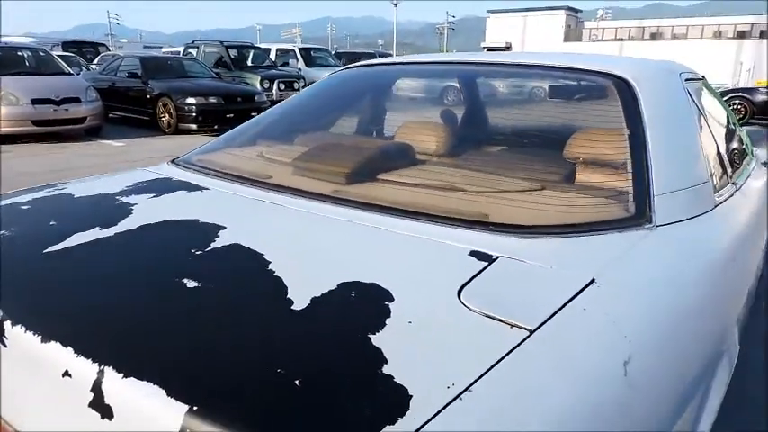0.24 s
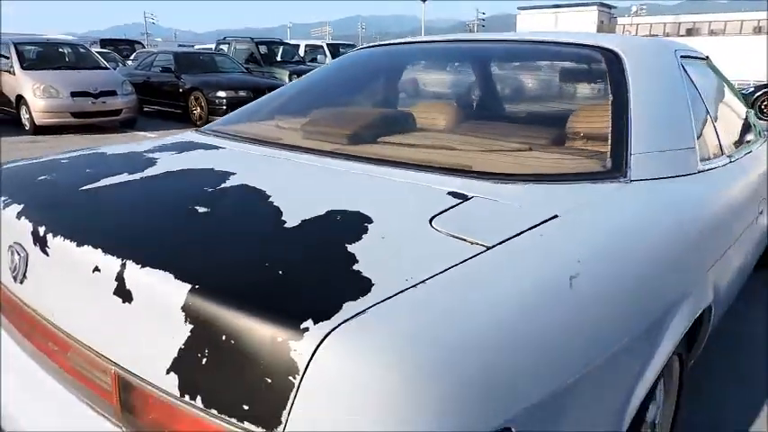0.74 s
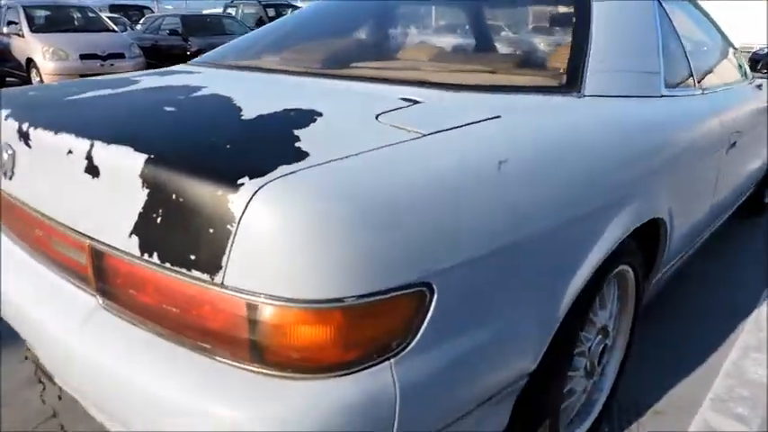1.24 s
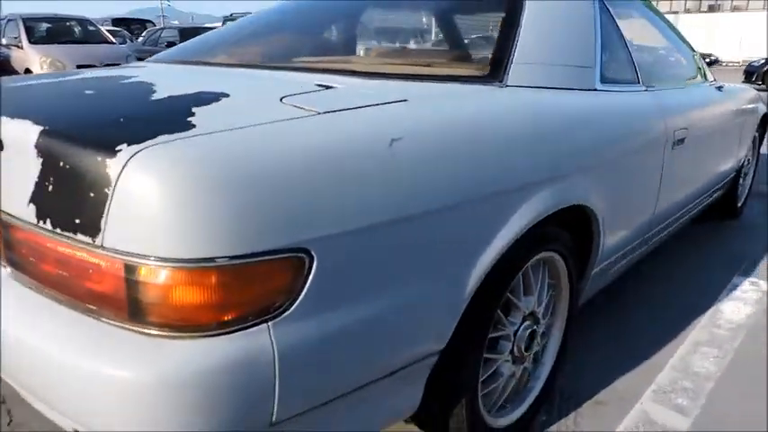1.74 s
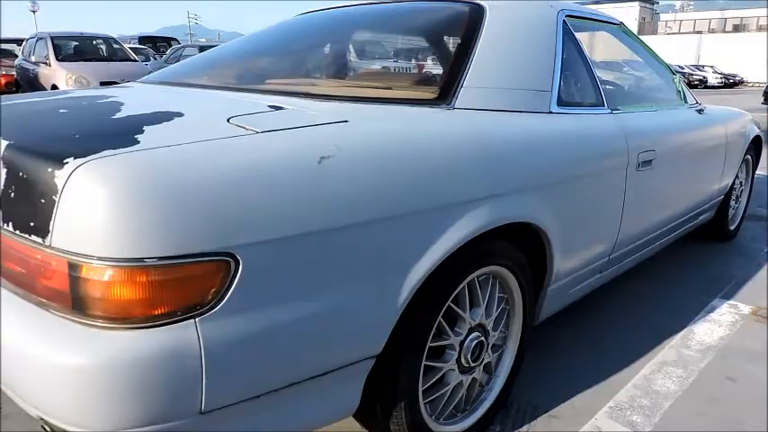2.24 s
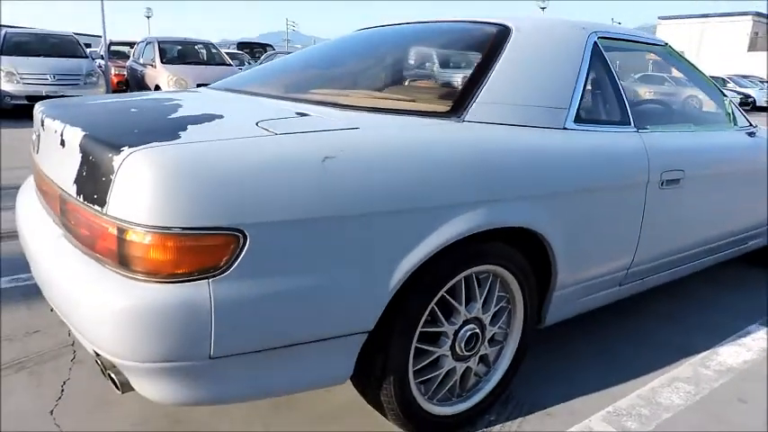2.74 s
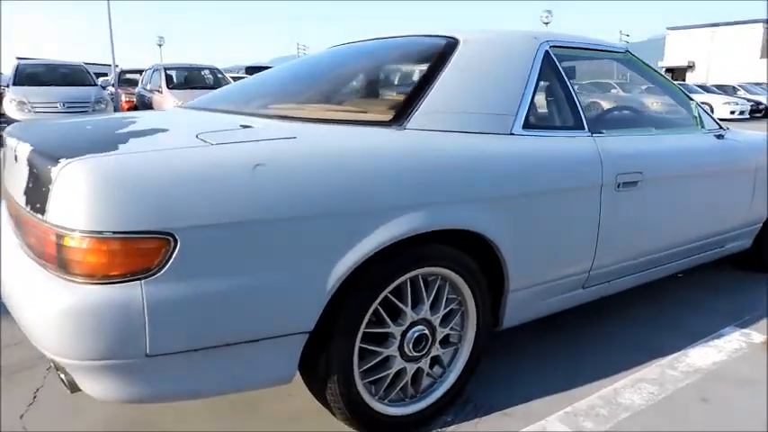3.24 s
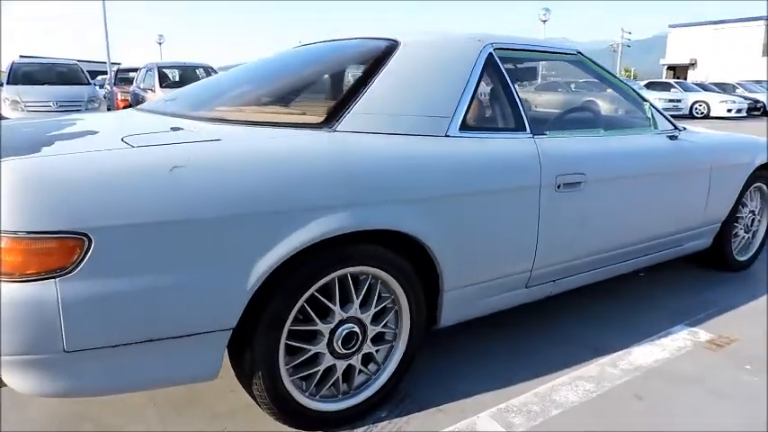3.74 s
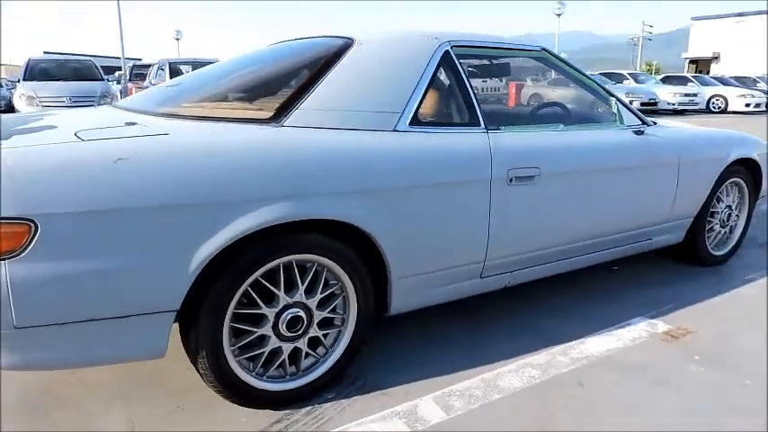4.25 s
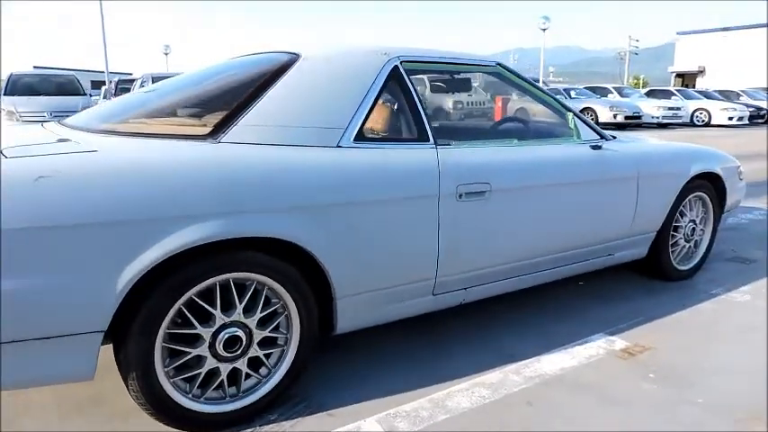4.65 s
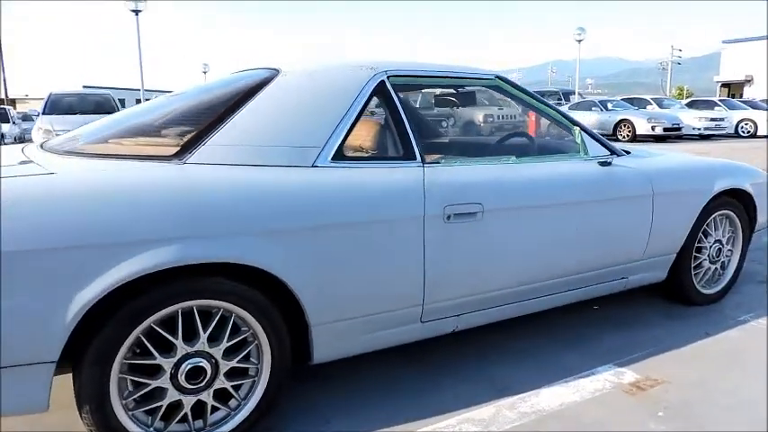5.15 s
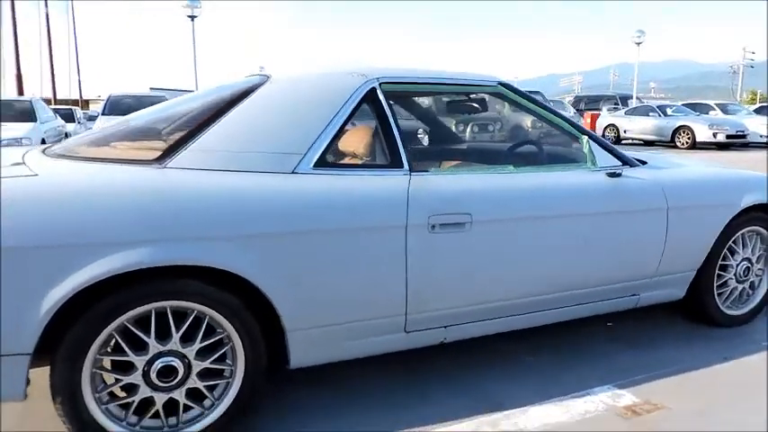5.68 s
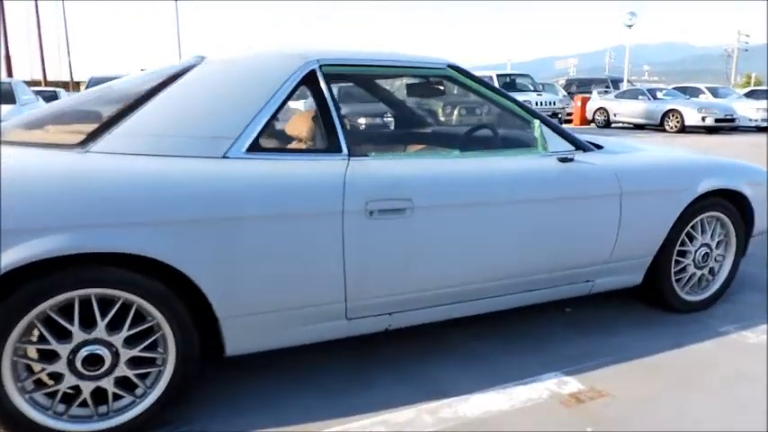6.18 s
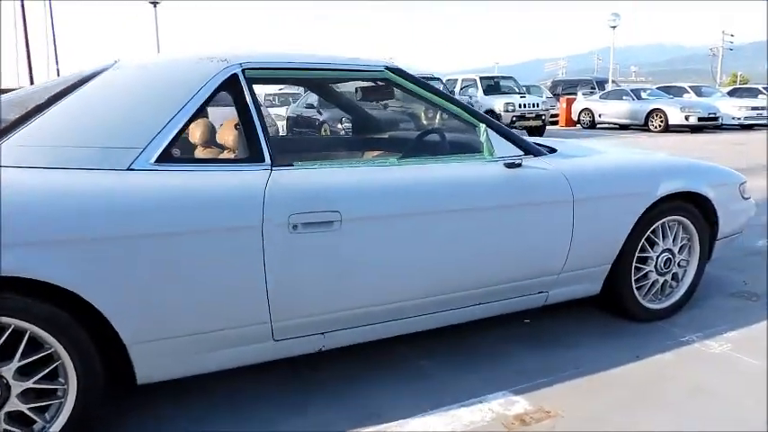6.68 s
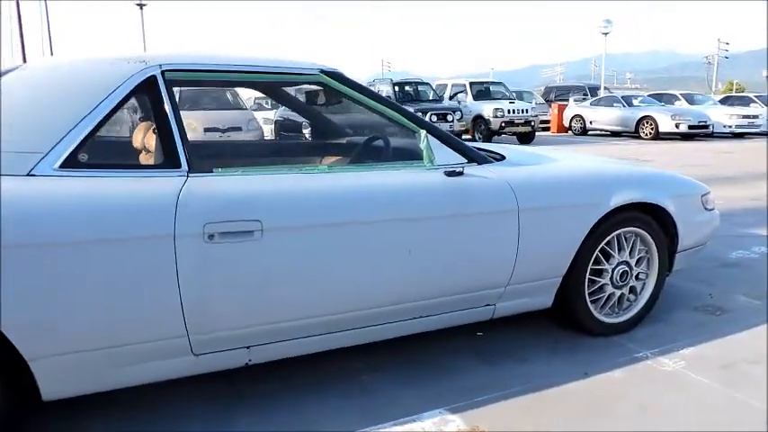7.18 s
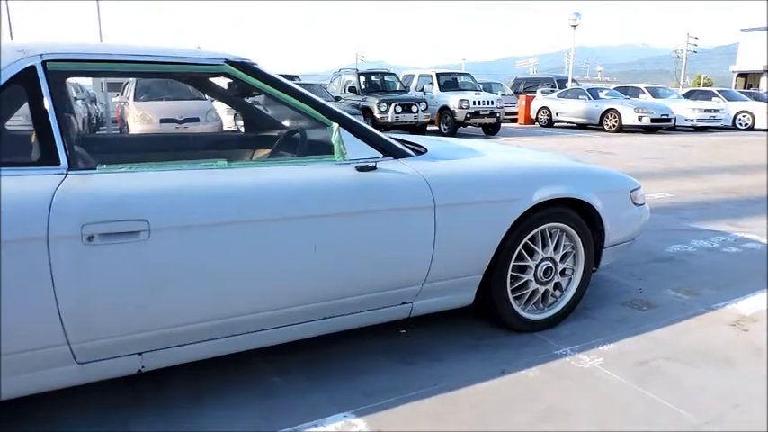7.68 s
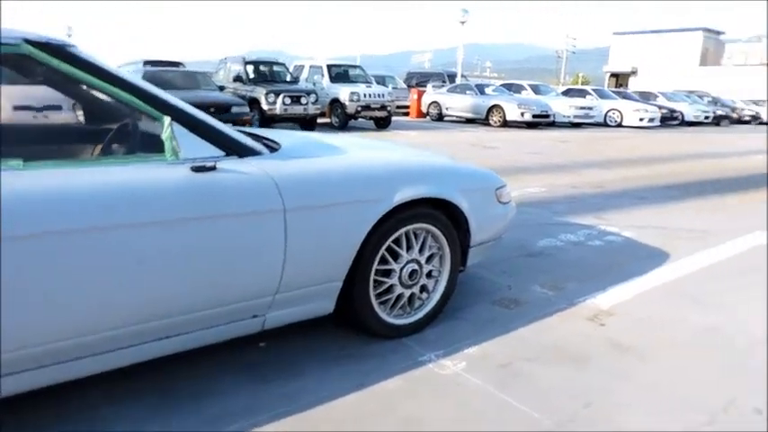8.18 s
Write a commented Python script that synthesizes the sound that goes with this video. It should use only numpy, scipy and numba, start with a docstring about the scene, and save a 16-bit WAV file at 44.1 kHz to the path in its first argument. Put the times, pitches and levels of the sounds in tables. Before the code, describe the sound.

Outdoors in an open car lot, a parked car idles continuously: deep bass drone, uneven throbs and quick dull exhaust puffs, strongest near the tail. A handheld microphone moves along the side, so the exhaust softens and a whirring engine bay takes over. Short wind rumbles hit early, the middle is calm, then gusts return around seven seconds and end in heavy, overloading buffets.

```python
"""Rotary engine idling in a windy lot

A three-rotor engine idles in an open car lot while a hand-held camera walks from the tail along its side.
Three uneven exhaust pulses a shaft turn: shaft-rate orders make the bass drone, gliding tones the throbbing
silencer note, resonated bursts the tailpipe puffs; shaped noise makes the engine bay's whirr.
Gusts of moving-corner noise and single eddies buffet either microphone port; the strongest turn the gain down.
A lens motor adds faint high sizzles."""
import sys
import numpy as np
from scipy import signal
from scipy.fft import rfft, irfft, next_fast_len
from scipy.io import wavfile
from numba import njit

SR = 44100
rng = np.random.default_rng(int(sys.argv[2]) if len(sys.argv) > 2 else 0)


def unload_audio(sound):
    """Save the sound as a 16-bit wav file, at the path given as the first command line argument."""
    columns = np.transpose(np.atleast_2d(sound))
    # keep every value between -1 and 1, then stretch to whole-number steps
    steps = np.round(np.clip(columns, -1, 1) * 32767)
    wavfile.write(sys.argv[1], SR, steps.astype(np.int16))


N = 371305
T = np.arange(N) / SR
RASP_SHARE = 0.4  # share of noise power that repeats every shaft turn


def amp(db):
    """Decibels to gain."""
    return 10 ** (np.asarray(db) / 20)


def unit(x):
    """Scales to rms 1."""
    return x / np.sqrt(np.mean(x ** 2) + 1e-20)


def follow(table):
    """Each column of a time table at every sample."""
    s, *columns = np.transpose(table)
    return [np.interp(T, s, column) for column in columns]


def read(points, hz):
    """A spectrum table interpolated on a log-frequency axis."""
    f, value = np.transpose(points)
    return np.interp(np.log(hz + 1), np.log(f + 1), value)


def waver(hz):
    """Slow random variation of rms 1, rolled off above the given rate."""
    f = np.fft.rfftfreq(N // 32, 32 / SR)
    slow = irfft(rfft(rng.standard_normal(N // 32)) / (1 + (f / hz) ** 4))
    return unit(np.interp(T, np.linspace(0, T[-1], len(slow)), slow))


def resonate(x, hz, width_hz, order=2):
    """A resonance of gain 1: shift to 0 Hz, low-pass several times for steep skirts, shift back."""
    carrier = np.exp(2j * np.pi * hz * T)
    r = np.exp(-np.pi * width_hz / SR)
    z = x / carrier + 1e-18
    for _ in range(order):
        z = signal.lfilter([1 - r], [1, -r], z)
    return 2 * (carrier * z).real


@njit
def smooth(x, step):
    """One-pole low-pass whose corner may move from sample to sample."""
    out, state = np.empty(len(x)), 0.
    for i in range(len(x)):
        state += step[i] * (x[i] - state)
        out[i] = state
    return out


def blend(fresh, repeated, share):
    """Mixes two noises at constant power."""
    return np.sqrt(1 - share) * fresh + np.sqrt(share) * repeated


def turn_pattern(turns, stray_turns=0.0012):
    """A broad rasp that comes back every shaft turn; its highest orders blur as the shaft wavers."""
    size = 3660  # points per turn
    pattern = unit(irfft(np.exp(2j * np.pi * rng.random(size // 2 + 1))))
    index = ((turns + stray_turns * waver(12)) * size).astype(int) % size
    return pattern[index]


def air_noise(spectrum, rasp=None):
    """Coloured noise at two ports, most alike in the midrange; part of it may be a machine's rasp."""
    # likeness of the two ports: (frequency [Hz], correlation [0-1])
    likeness = [(60, 0.58), (300, 0.93), (640, 0.95), (1400, 0.59), (3100, 0.3), (6800, 0.046),
                (15000, 0.17)]
    size = next_fast_len(N)
    hz = np.fft.rfftfreq(size, 1 / SR)
    a, b = rfft(rng.standard_normal((2, size)))
    if rasp is not None:
        a = blend(a, rfft(rasp, size), RASP_SHARE)
    same = read(likeness, hz)
    ports = np.array([a, same * a + np.sqrt(1 - same ** 2) * b])
    return unit(irfft(ports * amp(read(spectrum, hz)), size)[:, :N])


def orders(table, turns):
    """Multiples of the shaft rate that crest together at each whole turn."""
    return np.sqrt(2) * sum(amp(db) * np.cos(2 * np.pi * k * turns) for k, db in table)


def heard_from(source, camera_m):
    """Gain of one part of the car, falling with distance as the camera walks past."""
    place_m, aside_m, db, fall_db = source
    distance_m = np.hypot(camera_m - place_m, aside_m)
    return amp(db - fall_db * np.log2(distance_m / aside_m))


def drone(turns, unsteady=0.27, crest_turns=0.16):
    """Smooth low exhaust pressure wave; uneven burning makes each order swell and sink on its own."""
    # exhaust orders: (multiple of shaft rate, relative level [dB])
    exhaust_orders = [(2, -67), (3, -41.5), (4, -63), (5, -67), (6, -42), (9, -61)]
    return sum(orders([row], turns - crest_turns) * (1 + unsteady * waver(29)) for row in exhaust_orders)


def throbs(turns, uneven_db=0.7, uneven_length=0.06, uneven_pitch=0.0099):
    """Per turn, one long flat-topped note sliding slightly up and two short weak ones, each turn varied."""
    # silencer notes, one a rotor: (centre in turn [0-1], length [turns], pitch [multiple of shaft rate],
    # glide [multiples/turn], relative peak [dB])
    notes = [(.038, .433, 21.99, 2.66, 5.7), (.511, .248, 21.58, 7.8, -3.5), (.749, .164, 19.75, -10, 0)]
    out = np.zeros(N)
    for place, length, multiple, glide, db in notes:
        chance = rng.standard_normal((120, 3))
        before = np.floor(turns - place).astype(int)
        for turn in (before, before + 1):  # neighbouring turns may overlap
            strong, long, sharp = chance[turn].T
            age = turns - place - turn
            swell = np.exp(-(2 * age / (length * np.exp(uneven_length * long))) ** 4)
            cycles = multiple * (1 + uneven_pitch * sharp) * age + glide * age ** 2 / 2
            out += amp(db + uneven_db * strong) * swell * np.cos(2 * np.pi * cycles)
    return out


def silencer(turns, stray_turns=0.0014, ring_hz=276, width_hz=70, flow_db=-16.0, throb_db=0.97):
    """The silencer throbs each turn over the hum of its shell; pulsing gas flow rings a resonance."""
    # shell overtones: (multiple of shaft rate, relative level [dB])
    shell = [(12, -15), (15, -15.5), (18, -14), (26, -17), (33, -25.5)]
    shell_crest_turns = 0.2706
    turns = turns + stray_turns * waver(28.0)
    note = amp(throb_db) * throbs(turns) + orders(shell, turns - shell_crest_turns)
    flow = resonate(rng.standard_normal(N), ring_hz, width_hz) * (2 + np.cos(2 * np.pi * turns))
    return note + amp(flow_db) * unit(flow)


def firings(turns, uneven_db=1.0, jitter_s=0.0002):
    """One impulse per rotor per shaft turn; timing and strength vary as no two burn quite alike."""
    # rotors: (exhaust pulse's place in turn [0-1], relative puff level [dB])
    rotors = [(0.02, -20), (.365, -20), (.705, -19)]
    pulses = np.zeros(N)
    for place, db in rotors:
        late, strong = rng.standard_normal((2, 110))
        s = np.interp(np.arange(len(late)) + place, turns, T, right=np.inf) + jitter_s * late
        heard = (s > 0) & (s < T[-1])
        pulses[(s[heard] * SR).astype(int)] = amp(db + uneven_db * strong[heard])
    return pulses / pulses.max()


def puffs(turns, pop=0.8, steady_flow=0.015, decay_s=0.006):
    """Each firing pops and blows gas through the tailpipe resonances; their balance shifts in line with it."""
    # tailpipe resonances: (frequency [Hz], width per pole [Hz], relative level [dB], change in line [dB])
    tailpipe = [(405, 31, 0.5, -0.5), (534.6, 69, 7, 0.5), (638.5, 36, 0, 3.5), (698.6, 46, 2.5, -2),
                (809, 52, -1.5, 0.5), (930, 80, -1, -4.5), (1288, 340, -13, -3)]
    in_line_s, in_line_width_s = 1.24, 0.2  # camera crosses the pipe's axis
    pulses = firings(turns)
    blow = steady_flow + signal.lfilter([1], [1, -np.exp(-1 / (decay_s * SR))], pulses)
    breath = blend(rng.standard_normal(N), turn_pattern(turns), RASP_SHARE)
    gas = unit(blow * breath) + pop * unit(pulses)
    in_line = np.exp(-((T - in_line_s) / in_line_width_s) ** 2)
    return unit(sum(amp(db + beam_db * in_line) * resonate(gas, hz, width_hz)
                    for hz, width_hz, db, beam_db in tailpipe))


def engine_bay(turns, bay_gain, level_db=-47, beat=0.02, lope=0.039, flutter_db=0.56, tick_db=-80):
    """Fan, belts and intake whirr as noise in step with the shaft; an injector ticks once a turn."""
    # whirr: (frequency [Hz], relative density [dB per Hz])
    whirr_spectrum = [(150, -6), (300, 5.5), (450, -4), (560, 1), (690, 0.5), (800, -2.5), (950, -2),
                      (1100, -9), (1350, -6), (1510, -11.5), (1630, -11), (1910, -10.5), (1985, -13),
                      (2120, -13.5), (2500, -15), (2900, -17.5), (4000, -24.5), (6000, -28.5),
                      (9500, -31.5), (15000, -33.5)]
    tick_spectrum = [(5000, -23), (9500, -17), (11600, 4.5), (13500, -2.5)]  # same columns
    pulse = 1 + beat * np.cos(2 * np.pi * 3 * (turns - .1)) + lope * np.cos(2 * np.pi * (turns - .9))
    level = amp(level_db + flutter_db * waver(37))
    whirr = level * pulse * air_noise(whirr_spectrum, turn_pattern(turns))
    gate = np.exp(-((turns % 1 - .78) / 0.092) ** 2)
    tick = unit(gate * air_noise(tick_spectrum))
    return whirr + amp(tick_db) * bay_gain ** 2 * tick  # tick fades faster with distance than whirr


def ground_echo(x, first_s=0.0023, last_s=0.002615, echo_gain=0.17):
    """The pavement throws the engine back, with a delay that grows steadily along the walk."""
    delay_s = first_s + (last_s - first_s) * T / T[-1]
    echo = np.array([np.interp(T - delay_s, T, channel) for channel in x])
    return x + echo_gain * echo


def lot_rumble(level_db=-42):
    """Low rumble of the lot and the pipe: coloured noise at both ports."""
    # rumble: (frequency [Hz], relative density [dB per Hz])
    rumble_spectrum = [(12, -3), (28, -5), (45, 2), (80, -8), (130, -10), (165, -12.5), (205, -7.5),
                       (320, -19.5), (600, -21), (2000, -69)]
    return amp(level_db) * air_noise(rumble_spectrum)


def gust_force(port, breeze_db=-53, flutter_db=0.6, flutter_hz=28, attack_s=0.0059, release_s=0.0078):
    """Wind strength on one port in dB: each gust jumps up, flutters while it holds and falls away."""
    # gusts: (start [s], length [s], force [dB], port [0 left, 1 right])
    gusts = [(0.075, 0.21, -27.5, 0), (0.397, 1.31, -30.5, 0), (0.75, 0.09, -20, 0), (0.89, 0.058, -24, 0),
             (0.971, 0.033, -20.5, 0), (2.039, 0.2, -31.5, 1), (2.097, 0.041, -28, 0),
             (5.003, 0.11, -33, 0), (6.998, 0.059, -20, 1), (7.136, 0.052, -21.5, 1),
             (7.201, 0.072, -25.5, 1), (7.483, 0.038, -26.5, 1), (7.62, 0.15, -28, 1),
             (7.761, 0.21, -31, 0), (7.804, .06, -28.5, 1), (7.95, .47, -37.5, 0), (7.864, 0.016, -15, 1),
             (7.917, 0.019, -14, 1), (7.94, 0.25, -14.5, 1), (7.962, 0.067, -16, 1),
             (8.089, 0.047, -12.5, 1), (8.187, 0.048, -9, 1), (8.24, 0.054, -10.5, 1),
             (8.301, 0.034, -9, 1), (8.354, 0.088, -11, 1), (8.401, 0.056, -9.5, 1)]
    power = amp(breeze_db) ** 2
    for start, length, db, side in gusts:
        if side == port:
            rise = np.clip((T - start) / attack_s, 0, 1)
            fall = np.exp(-np.maximum(T - start - length, 0) / release_s)
            power = power + (amp(db) * rise * fall) ** 2
    return 10 * np.log10(power) + flutter_db * waver(flutter_hz)


def wind(force_db, corner_hz=510, db_per_octave=9, cut_hz=125, cut_db_per_octave=18, shed=0.93,
         level_db=-1.5, hollow_hz=215, hollow_width_hz=130, hollow=0.55):
    """Turbulence on one port: the harder it hits, the higher its rumble moves."""
    crackle_db = 2.7 * waver(260)
    strength_db = force_db + 9  # 0 where the corners take their nominal values
    step = np.clip(2 * np.pi * corner_hz / SR * 2 ** ((strength_db + crackle_db) / db_per_octave), 0, .5)
    cut = np.clip(2 * np.pi * cut_hz / SR * 2 ** (strength_db / cut_db_per_octave), 0, .5)
    rumble = rng.standard_normal(N) / np.sqrt(step)
    for _ in range(4):
        rumble = smooth(rumble, step)
    rumble = unit(rumble) * amp(level_db + force_db + crackle_db / 2)
    for _ in range(2):
        rumble = rumble - shed * smooth(rumble, cut)  # fast air sheds small eddies and few large ones
    hard = np.clip((force_db + 23) / 7, 0, 1)
    rumble = rumble + hollow * hard * resonate(rumble, hollow_hz, hollow_width_hz)  # hard gusts boom
    mesh = signal.butter(3, 2400, fs=SR, output="sos")  # the port's mesh stops the finest eddies
    return signal.sosfilt(mesh, rumble * (1 + 2.72 * cut / step))  # raised more where the bass cut bites


def heave(force_db, level_db=-16.5, follows=0.54):
    """Slow, wide eddies under a gust: a soft low push that grows less than the gust itself."""
    # heave: (frequency [Hz], relative density [dB per Hz])
    heave_spectrum = [(10, -3), (30, 1), (60, -4), (100, -5), (200, -16), (400, -39), (1500, -78)]
    fade_in = np.clip((force_db + 48.5) / 12, 0, 1)
    return amp(level_db + follows * force_db) * fade_in * air_noise(heave_spectrum)[0]


def eddy(width_s, swing=0.28):
    """A lone pressure pulse with a soft swing the other way before and after, centred in its window."""
    u = np.arange(-1000, 1001) / SR / width_s
    shape = np.exp(-u ** 2) - swing * np.exp(-(u / 3) ** 2)
    return shape / abs(shape).max()


def slaps(port, force_db, per_s=22, eddy_db=-7, width_s=0.0005):
    """Large eddies thump the port one by one; small suctions at random follow the wind's force."""
    # hardest eddies: (time [s], level [dB], width [s], port [0 left, 1 right], sign [1 push, -1 suction])
    hard_eddies = [(0.242, -18, 0.0012, 0, 1), (.721, -15, 0.0021, 0, 1), (0.785, -15, 0.0039, 0, -1),
                   (0.796, -15, .0011, 0, 1), (.907, -10.5, 0.0021, 0, -1), (0.95, -16, 0.0018, 0, 1),
                   (.987, -10.5, 0.0013, 0, 1), (1, -14, 0.0022, 0, 1), (2.115, -18, 0.002, 0, 1),
                   (2.141, -21, 0.0035, 0, -1), (7.003, -10, 0.0011, 1, 1), (7.036, -19, 0.0019, 1, 1),
                   (7.156, -14, 0.0022, 1, -1), (7.18, -8.5, 0.0013, 1, -1), (7.265, -17, 0.0032, 1, -1),
                   (7.863, -16, 0.0039, 1, 1), (7.871, -2, 0.00069, 1, -1), (7.878, -5.5, .0009, 1, 1),
                   (8, -2.5, 0.001, 1, 1), (8.071, 7.5, 0.0007, 1, -1), (8.094, 9, 0.001, 1, -1),
                   (8.1, 5, 0.00044, 1, -1), (8.106, 3.5, 0.00087, 1, -1), (8.226, 3, 0.00099, 1, -1),
                   (8.269, -3, 0.00058, 1, 1), (8.29, -1, 0.0015, 1, 1), (8.316, -2, 0.00053, 1, -1),
                   (8.331, -5.5, 0.00041, 1, -1), (8.398, -7, 0.00025, 1, 1), (8.413, -4, 0.00062, 1, -1)]
    kicks = -amp(force_db + eddy_db) * (rng.random(N) < per_s / SR)
    out = signal.oaconvolve(kicks, eddy(width_s), "same")
    for s, db, wide_s, side, push in hard_eddies:
        if side == port:
            thump = push * amp(db) * eddy(wide_s)
            part = out[int(s * SR) - len(thump) // 2:][:len(thump)]
            part += thump[:len(part)]
    return out


def buffeting(port):
    """The gusts on one port drive its rumble, its low heave and its slaps."""
    force_db = gust_force(port)
    return wind(force_db) + heave(force_db) + slaps(port, force_db)


def hiss(level_db=-76):
    """Steady white noise, independent at each port."""
    return amp(level_db) * rng.standard_normal((2, N))


def lens_motor(level_db=-1, fuzz_hz=180, wander=0.12, sweep_hz=1200):
    """The focus drive sizzles and rings the lens barrel; its thin whine rises to mid-run and falls back."""
    # focus runs: (start [s], end [s], sizzle low edge [Hz], high edge [Hz], relative level [dB],
    # whine amplitude [re sizzle rms], nominal top whine pitch [Hz])
    focus_runs = [(0.59, .8, 9500, 15000, -71, 0.26, 14000), (1.11, 1.29, 13200, 15000, -68.5, .4, 14200),
                  (1.25, 1.684, 12350, 16000, -67, .3, 14200), (2.083, 2.42, 9000, 14700, -69.5, .6, 13900),
                  (2.677, 2.98, 12600, 16000, -64.5, .3, 14200),
                  (3.78, 4.12, 10600, 14600, -65.5, .6, 14150),
                  (4.38, 4.78, 12900, 16000, -65.5, .3, 14200), (6.248, 6.43, 13200, 15800, -63, .4, 14500),
                  (6.5, 6.565, 13200, 14400, -66, .4, 14100), (7.38, 7.727, 12800, 15300, -74, 1.3, 14500)]
    # lens barrel resonances: (frequency [Hz], width per pole [Hz], gain [dB])
    barrel = [(11500, 370, -4), (14000, 360, -3)]
    out = np.zeros((2, N))
    drift, fuzz = wander * waver(9), fuzz_hz * waver(300)
    rub = rng.standard_normal((2, N))
    rub = rub + sum(amp(db) * resonate(rub, hz, width_hz) for hz, width_hz, db in barrel)
    for start, end, low_hz, high_hz, db, whine, whine_hz in focus_runs:
        span = (T > start) & (T < end)
        band = signal.butter(2, [low_hz, high_hz], "band", fs=SR, output="sos")
        sizzle = unit(signal.sosfilt(band, rub[:, span]))
        lag = (2 * (T[span] - start) / (end - start) - 1) ** 2  # 1 at both ends, 0 midway
        hz = whine_hz - sweep_hz * (lag + drift[span]) + fuzz[span]
        tone = whine * np.sin(2 * np.pi * np.cumsum(hz) / SR)
        out[:, span] += amp(db + level_db) * signal.windows.tukey(len(hz), .35) * (sizzle + tone)
    return out * amp(1.7 * waver(30))


def scene():
    """The car lies a little toward the right port; wind and lens motor act on the camera itself."""
    # idle hunting up and down: (time [s], shaft speed [turns/min])
    speed = [(0.0, 703.3), (2.75, 740.2), (3.6, 712.0), (4.6, 701.4), (5.9, 739.4), (7.4, 709.4),
             (8.42, 676.9)]
    # walk along the car: (time [s], camera position [m forward of tailpipe])
    walk = [(0, -1), (.8, -1.1), (2.3, 1.24), (4, 1.8), (6, 1.68), (7, 2), (8.42, 4)]
    # where each sound leaves the car: (position [m forward of tailpipe], offset from camera path [m],
    # gain abreast [dB], loss per doubling of distance [dB])
    drone_at = (-1, 2.4, 7, 6.5)
    silencer_at = (1.26, 1.9, -34.5, 12)
    puffs_at = (-0.3, 1.03, -42.5, 10)
    bay_at = (2.85, 2.73, 2.24, 6.4)
    turns = np.cumsum(follow(speed)[0]) / 60 / SR
    camera_m = follow(walk)[0]
    bass_gain = heard_from(drone_at, camera_m)
    bay_gain = heard_from(bay_at, camera_m)
    exhaust = bass_gain * drone(turns)
    exhaust = exhaust + heard_from(silencer_at, camera_m) * silencer(turns)
    exhaust = exhaust + heard_from(puffs_at, camera_m) * puffs(turns)
    bay = bay_gain * ground_echo(engine_bay(turns, bay_gain))
    left, right = exhaust + bay + bass_gain * lot_rumble()
    left = np.pad(left, (3, 0))[:N]  # the car reaches the left port 3 samples late
    ports = amp([[-2.4], [1.8]]) * (np.array([left, right]) + lens_motor())
    return ports + np.array([buffeting(port) for port in range(2)]) + hiss()


def record(dry, threshold_db=-20, squeeze=0.56, attack_s=0.054, recovery_db_per_s=6, edge_hz=15730):
    """Gain control follows the louder port and recovers slowly; then overload and the band limit."""
    power = smooth((dry ** 2).max(0), np.full(N, 1 / (attack_s * SR)))
    over_db = np.maximum(10 * np.log10(power + 1e-12) - threshold_db, 0)
    recovered_db = recovery_db_per_s * T
    held_db = np.maximum.accumulate(over_db + recovered_db) - recovered_db
    out = np.tanh(dry * amp(-squeeze * held_db))
    low_pass = signal.firwin(511, edge_hz, window=("kaiser", 9), fs=SR)
    return signal.oaconvolve(out, low_pass[None], "same")


dry = scene()
out = record(dry)
unload_audio(out)
```